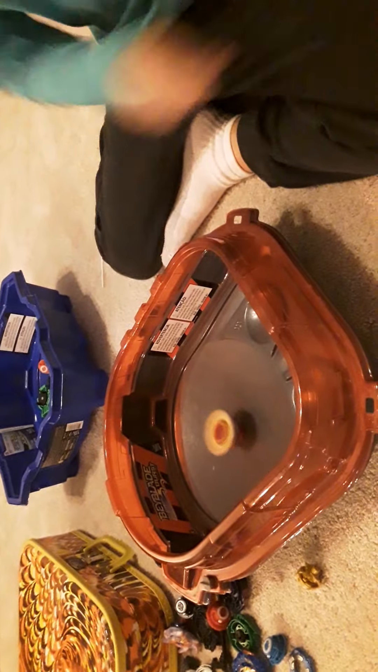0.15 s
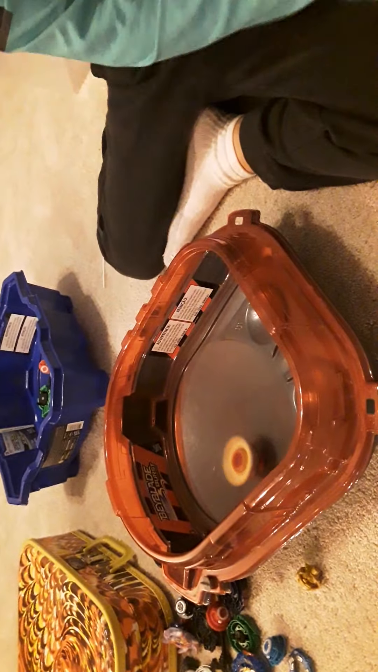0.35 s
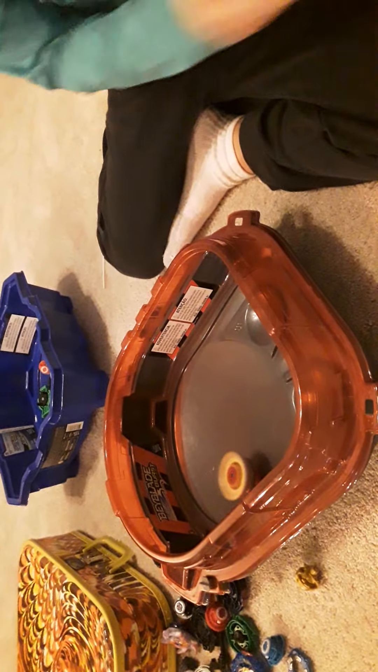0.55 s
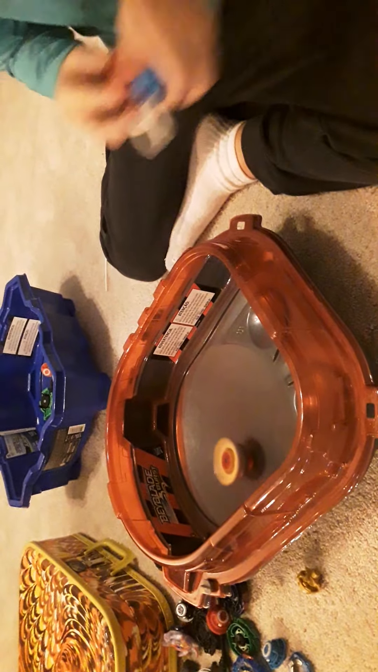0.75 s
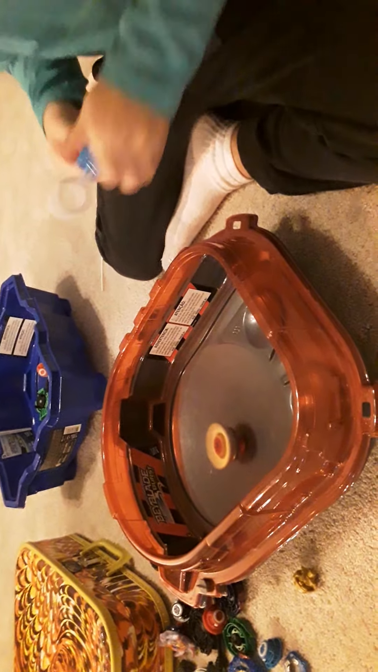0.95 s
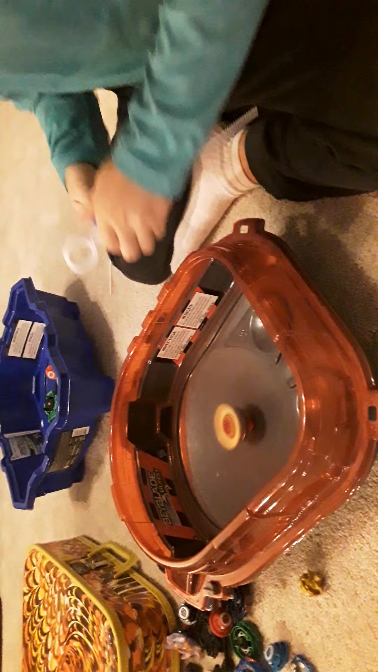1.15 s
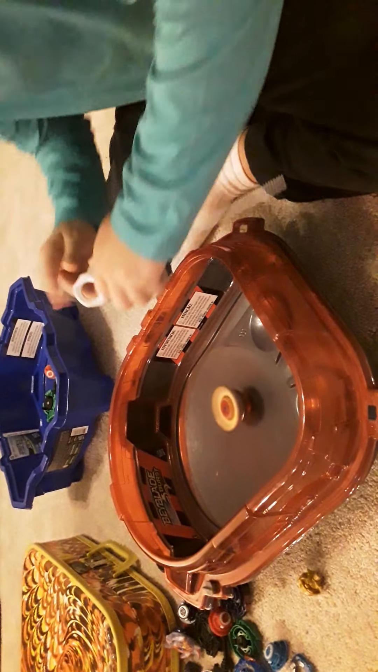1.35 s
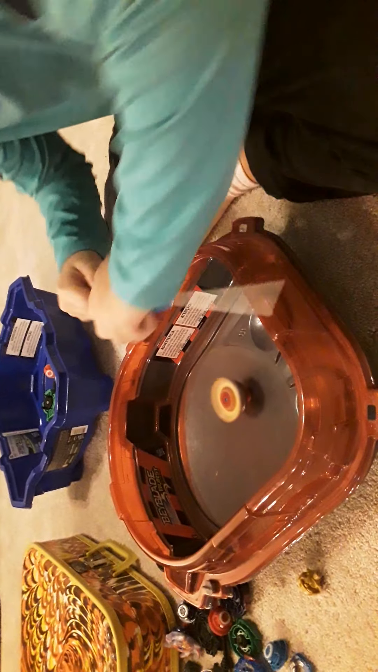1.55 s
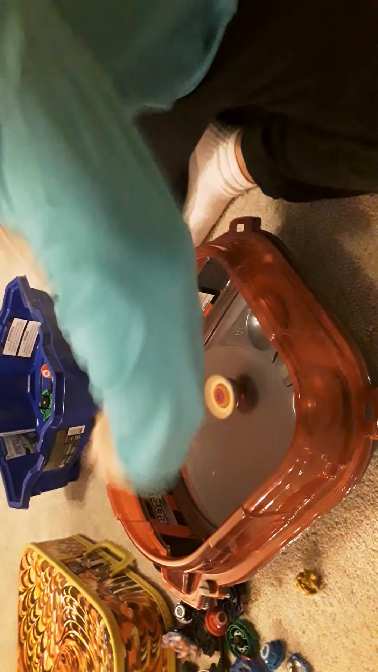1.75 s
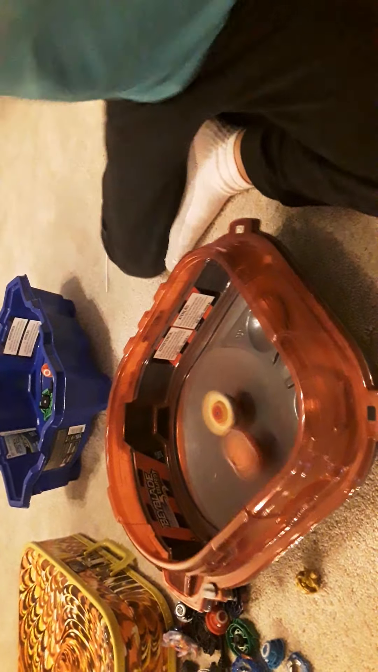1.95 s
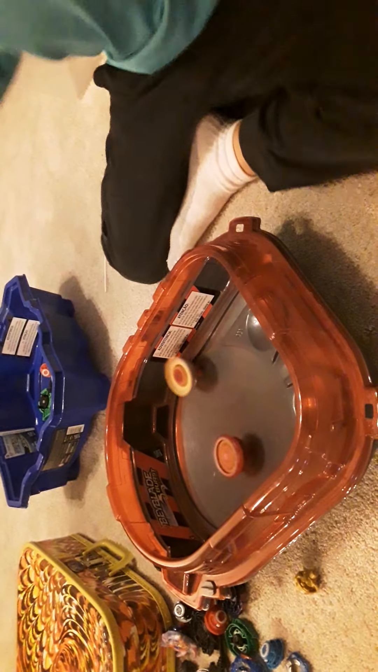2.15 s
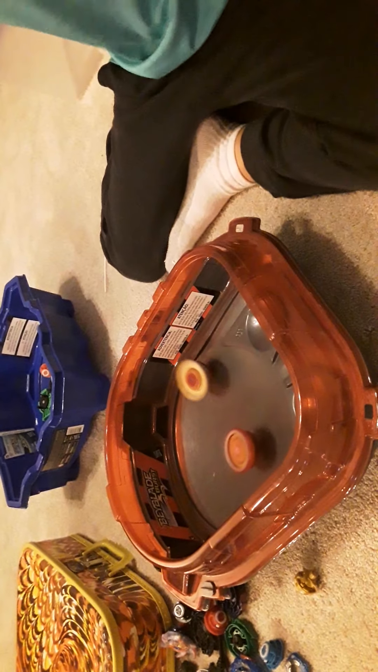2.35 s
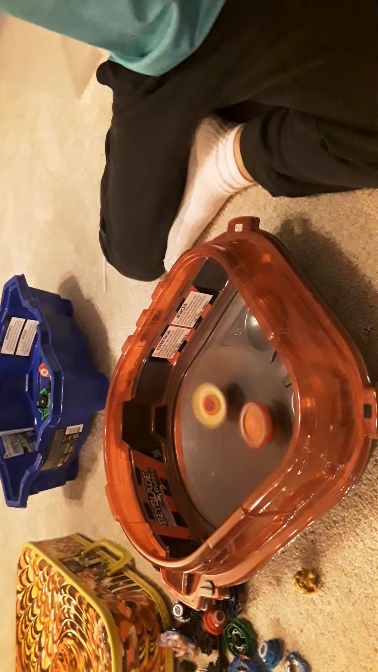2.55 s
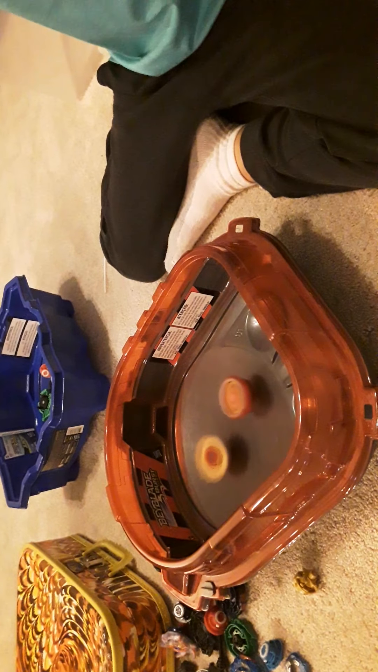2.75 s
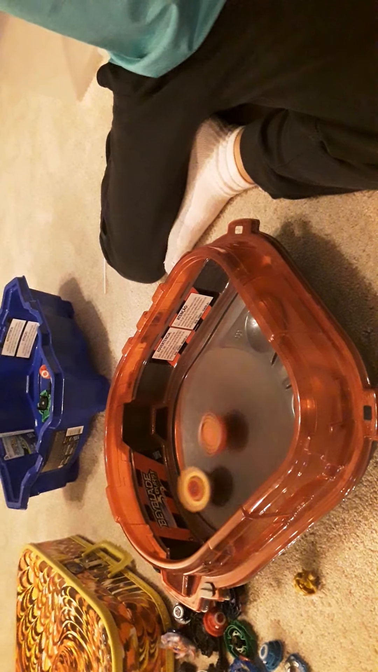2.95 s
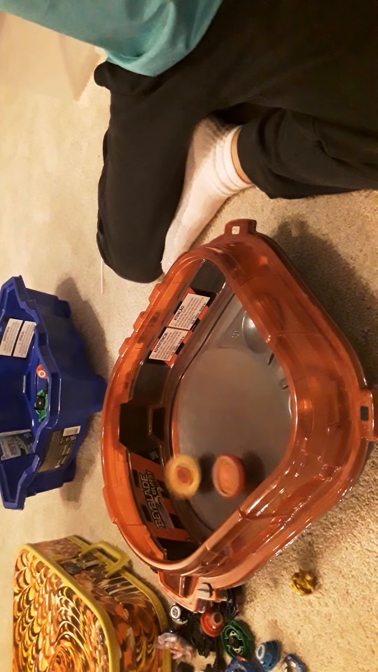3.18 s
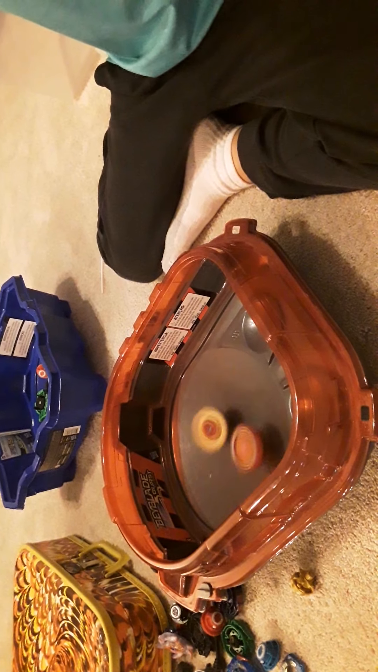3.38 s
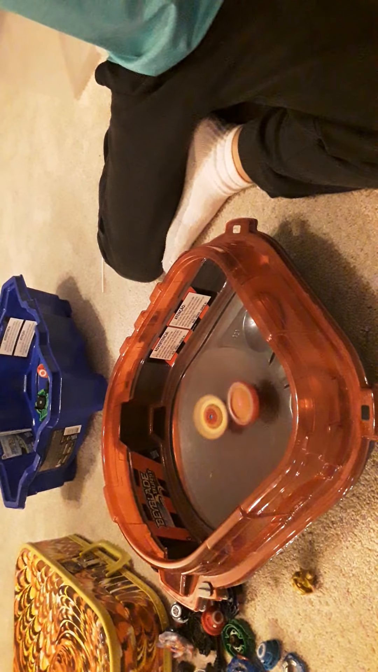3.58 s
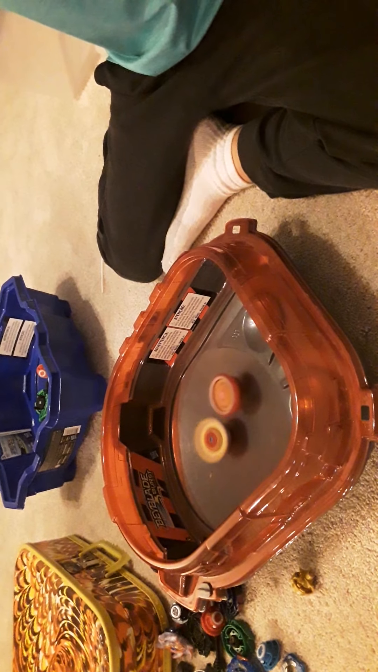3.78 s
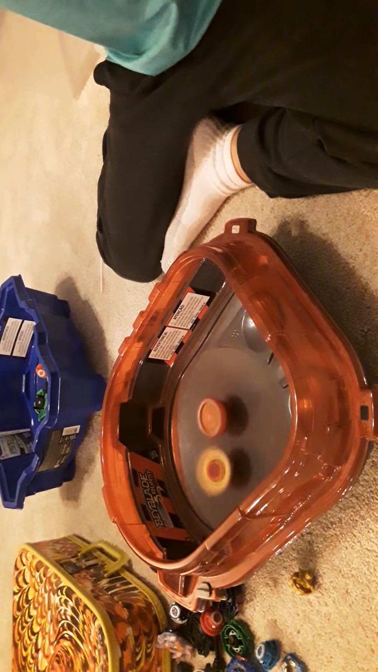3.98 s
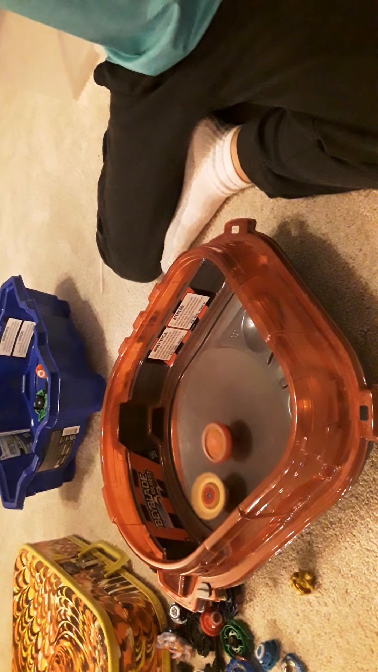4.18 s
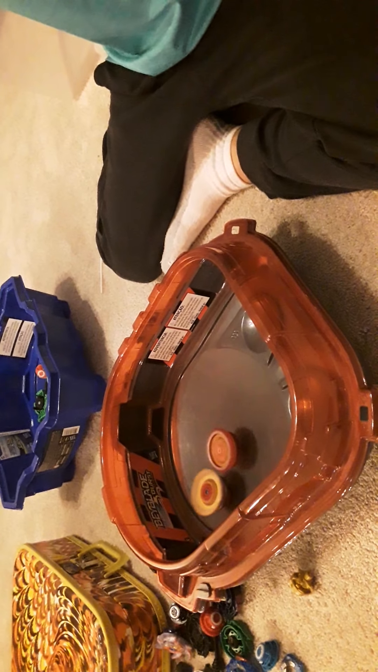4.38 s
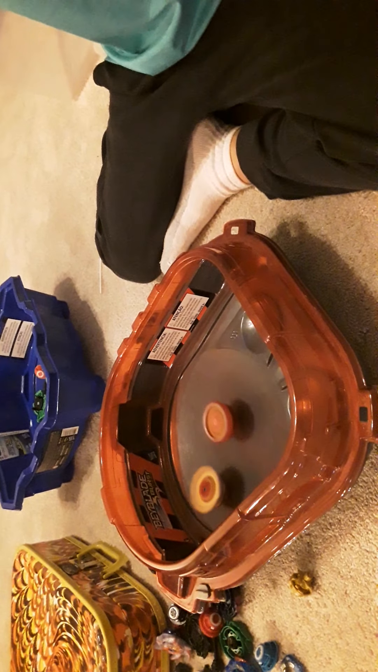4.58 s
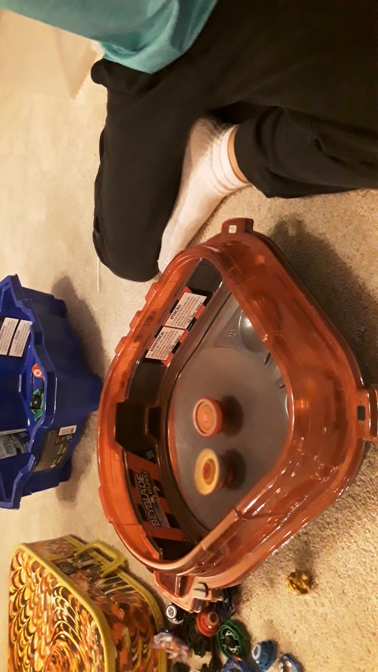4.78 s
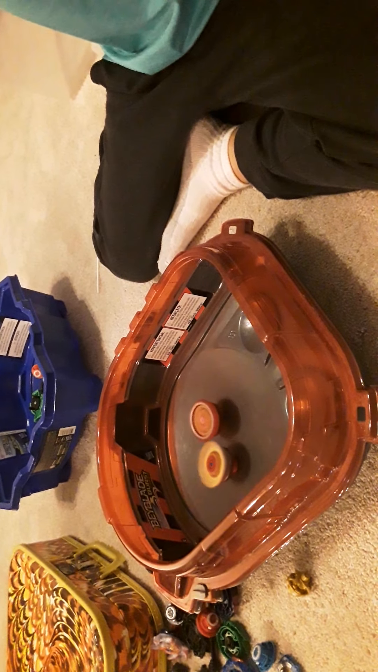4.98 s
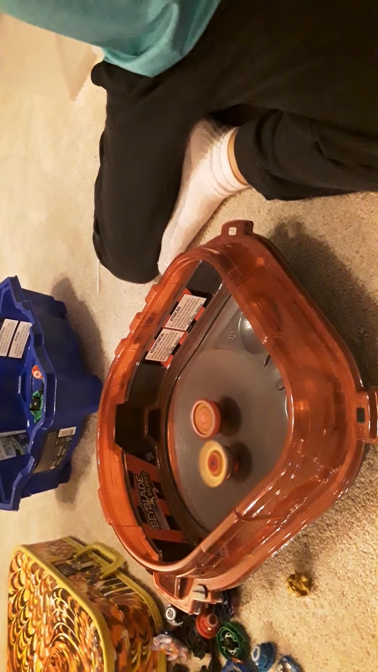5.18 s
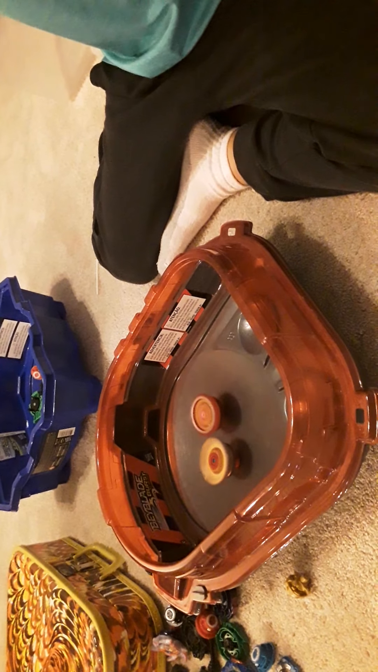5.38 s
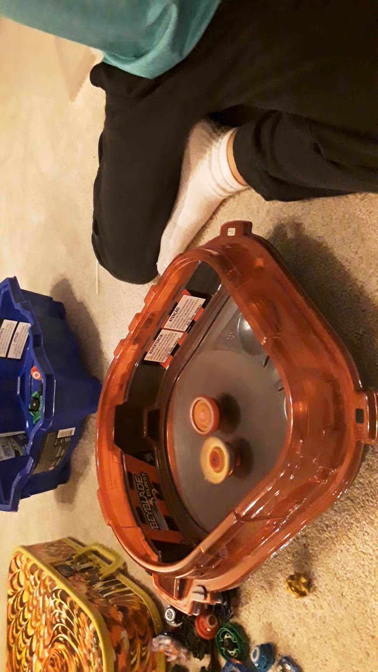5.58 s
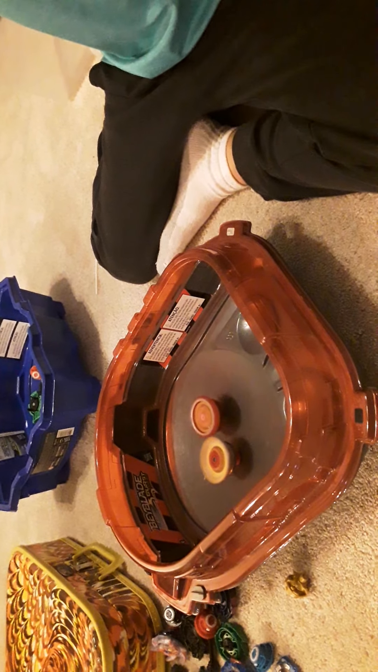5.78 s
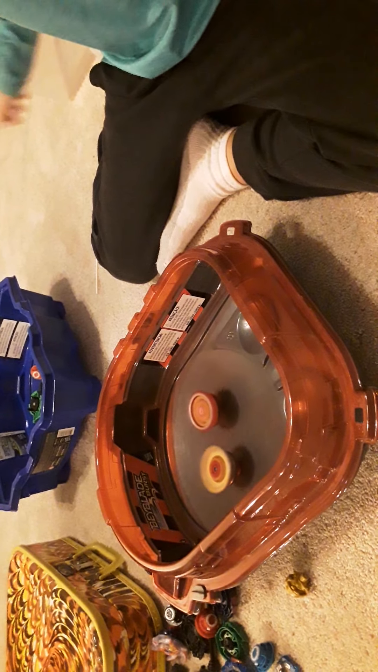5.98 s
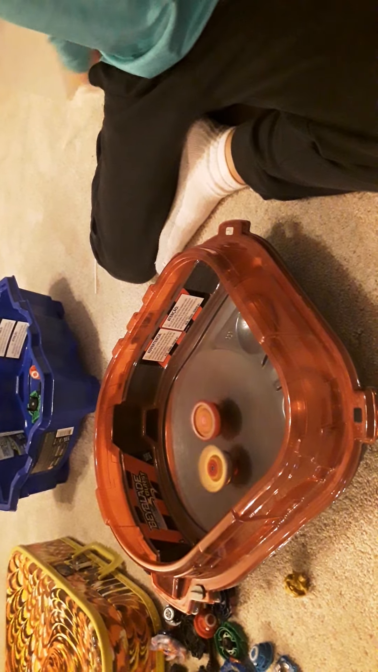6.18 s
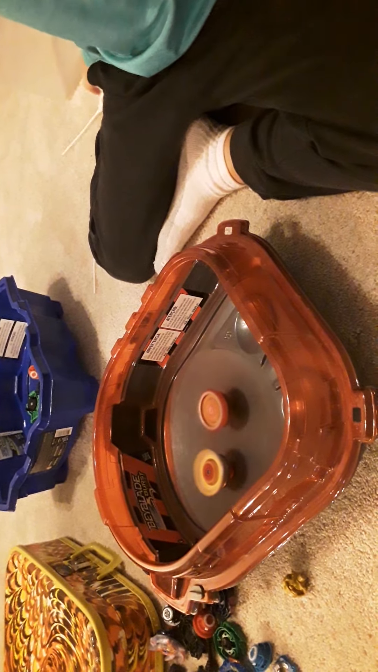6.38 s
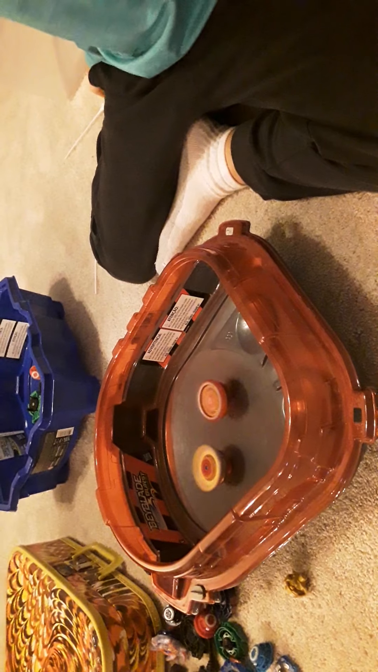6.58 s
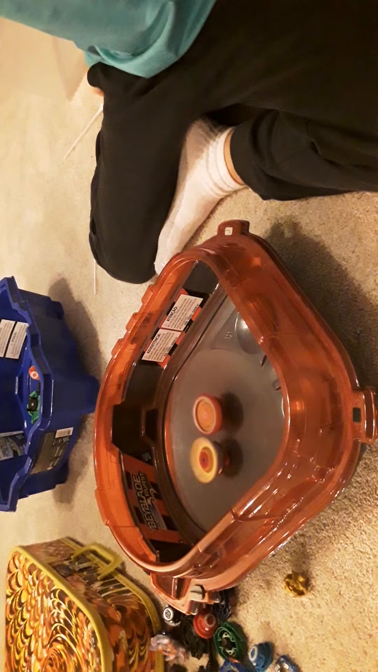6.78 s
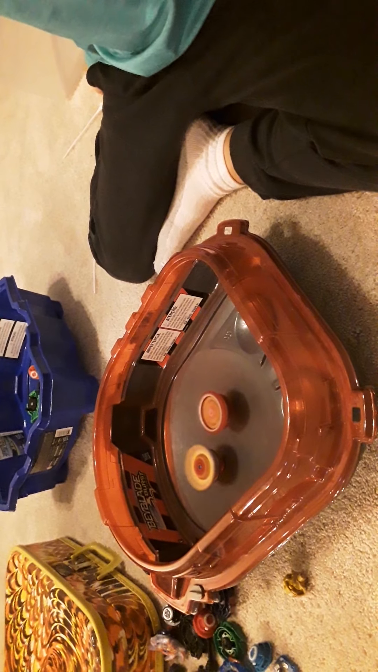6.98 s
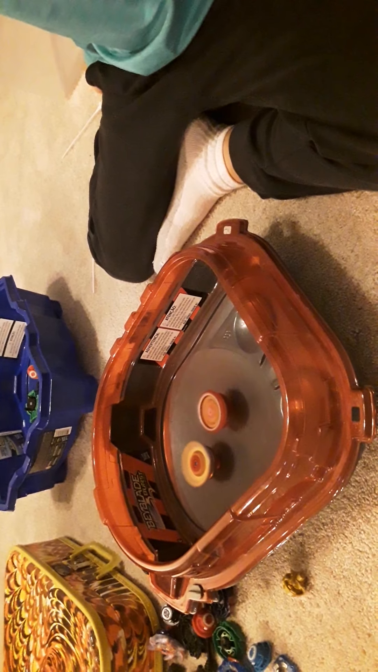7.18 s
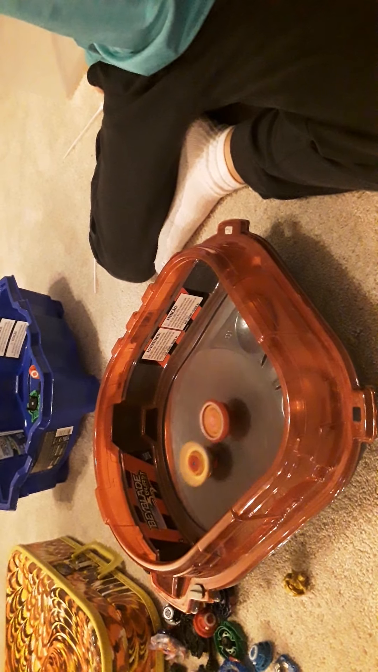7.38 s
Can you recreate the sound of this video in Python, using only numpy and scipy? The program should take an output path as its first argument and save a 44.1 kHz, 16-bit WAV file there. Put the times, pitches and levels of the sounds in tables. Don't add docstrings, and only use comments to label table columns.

```python
import sys
import numpy as np
from scipy import signal
from scipy.fft import rfft, irfft
from scipy.io import wavfile
from scipy.ndimage import uniform_filter1d

SR = 44100
rng = np.random.default_rng(int(sys.argv[2]) if len(sys.argv) > 2 else 0)


def transcribe(u):
    v = np.clip(np.atleast_2d(u).T, -1, 1)
    q = np.round(v * 32767).astype(np.int16)
    wavfile.write(sys.argv[1], SR, q)


def attenuation_scalar(level_db):
    decades = np.asarray(level_db, float) / 20
    return 10 ** decades


N = 327646

# (time [s], peak level [dB], bowl thump [dB], contact length [ms])
BLOWS = [(2.0216, -2.5, -35.5, 9), (3.0734, -8, -18, 2.8), (3.0822, 3, -38, 9), (3.5583, -8.5, -40, 13),
         (3.9863, -5, -49, 2.8), (4.43, -10, -33.5, 7.3), (4.4602, -6.5, -35, 3.6), (4.474, -5.5, -44, 9.7),
         (4.9117, -5.5, -32, 6), (5.0379, -6.5, -25, 5.3), (5.0551, -11, -72, 5.2), (5.0915, -16, -41, 4.1),
         (5.1767, -11.5, -51, 5.8), (5.238, -8, -33.5, 3.1), (5.3649, -11.5, -32, 3),
         (5.6089, -12.5, -29, 7.3), (5.839, -18, -24, 6), (5.8534, -3, -34, 2.8), (6.297, -23, -37, 4),
         (6.3045, -9.5, -28, 4.4), (6.856, -11, -13.5, 3.8), (7.4084, -27.5, -45, 2.7)]
# (time [s],
# peak level [dB], bowl thump [dB], body [dB], contact length [ms])
SLAMS = [(0.0542, -24, -17, -16, 3.5), (0.2452, -9.5, -41, -15.5, 3.2), (1.7962, 7, -11.5, -50, 4.1),
         (1.8331, -11, -31, -12, 6), (1.925, -3.5, -33, -5, 13), (2.027, -14, -1.5, -12, 3),
         (3.1471, -11, -22.5, -9.5, 5.1), (3.2004, -13.5, -24, -10, 1.2), (4.0032, -14, -29, -19, 2.9),
         (4.9249, -13.5, -18.5, -13.5, 14.2), (7.414, -16.5, -27.5, -19.5, 6.7)]
# (frequency [Hz], level [dB], time to fall 60 dB [s])
RESONANCES = [(516, 2, .06), (800, 2, .06), (1035, 1, .06), (1250, -1, .06), (2350, -6, .03),
              (2800, -1, .015), (3300, -8, .03), (4920, -6, .02), (5500, -6, .02), (6500, -6, .02),
              (7150, -4, .015), (7700, -2, .015), (8200, -4, .015), (9350, -4, .02), (10400, -6, .02),
              (11880, -4, .04)]
# (frequency [Hz], density [dB per Hz])
PLASTIC = [(180, -54), (300, -7.5), (526, -24), (1020, -12), (1840, -13), (2790, -9), (3570, -13),
           (4070, -13), (4490, -12.5), (6790, -5), (8010, 2), (9140, -4.5), (11700, -2.5), (15500, -23.5)]
# (frequency [Hz], density [dB per Hz])
LAUNCHER = [(240, -53), (400, -35.5), (605, -30), (821, -26), (928, -37.5), (2030, -20.5), (2880, -9.5),
            (4100, -18), (5230, -12), (7550, -6), (10100, -14.5), (11600, -2), (15500, -21.5)]


def colour(table, hz):
    f, db = np.transpose(table)
    return attenuation_scalar(np.interp(np.log(hz + 1), np.log(f), db))


def causal(gain):
    cepstrum = irfft(np.log(gain + 1e-6))
    half = len(cepstrum) // 2
    cepstrum[1:half] *= 2
    cepstrum[half + 1:] = 0
    return np.exp(rfft(cepstrum))


def resonate(hz, db):
    f, base_db, t60 = np.array(RESONANCES).T[:, :, None]
    width = np.log(1000) / (np.pi * t60)
    return 1 + np.sum(attenuation_scalar(base_db + db[:, None]) / (1 + 2j * (hz - f) / width), axis=0)


def unit(x):
    return x / np.sqrt(np.mean(x ** 2))


def walk(rate):
    hold = int(SR / rate)
    levels = np.repeat(rng.standard_normal(N // hold + 1), hold)
    return unit(uniform_filter1d(levels, hold)[:N])


def part(x, table, lo_hz, hi_hz):
    hz = np.fft.rfftfreq(len(x), 1 / SR) + 1
    edges = 1 / np.sqrt((1 + (lo_hz / hz) ** 6) * (1 + (hz / hi_hz) ** 6))
    return unit(irfft(rfft(x) * edges * colour(table, hz), len(x)))


def contacts(rows, body, scatter_db, rub=False, alike=0., stutter_db=0.):
    # (frequency [Hz], level [dB], time to fall 60 dB [s])
    thump_modes = [(105, 9.5, 0.011), (220, 2.5, 0.013), (540, -16, 0.029)]
    size = 4096
    out = np.zeros((2, N + size))
    t = np.arange(size) / SR
    hz = np.fft.rfftfreq(size, 1 / SR)
    noise = rng.standard_normal((len(rows), size))
    strike = rng.standard_normal((len(rows), len(RESONANCES)))
    noise = alike * noise[0] + np.sqrt(1 - alike ** 2) * noise
    step = int(3 * SR / 1000)
    grip = rng.standard_normal((len(rows), size // step + 1))
    stutter = attenuation_scalar(stutter_db * np.repeat(grip, step, axis=1)[:, :size])
    noise = noise * uniform_filter1d(stutter, step // 2)
    thump = sum(attenuation_scalar(db) * np.sin(2 * np.pi * f * t) * 1000 ** (-t / t60) for f, db, t60 in thump_modes) / 2
    for (s, db, thump_db, body_db, sheen_db, ms), chatter, luck in zip(rows, noise, strike):
        length = max(ms, .5) / 1000
        if rub:
            swell = np.sin(np.pi * np.minimum(t / length, 1))
        else:
            swell = np.minimum(t / 0.00017, 1) * np.exp(-(0.99 * t / length) ** 1.1)
        push = rfft(chatter * swell)
        tilt = colour([(3000, body_db + 14.5), (4800, 0.013), (9500, 0.013), (11500, sheen_db - 0.5)], hz)
        shape = causal(colour(body, hz) * tilt) * resonate(hz, scatter_db * luck)
        crack = irfft(push * shape)
        spread = irfft(push * shape if rub and ms > 9 else shape)
        both = np.array([crack, unit(spread) * np.std(crack)]) / np.abs(crack).max()
        i = int((s - rub * length / 2) * SR)
        boom = attenuation_scalar(thump_db + 6.0) * thump * [[1], [.4]]
        out[:, i:i + size] += attenuation_scalar(db) * (attenuation_scalar(2.5) * both + boom)
    return out[:, :N]


def ticks(rows, body):
    ms = 4.6
    rows = [(s + ms / 2000, db - 5.0, -45, -17, -6, ms) for s, db in rows]
    return contacts(rows, body, 1.5, rub=True, alike=.65)


def hiss():
    # (frequency [Hz], density [dB per Hz])
    house = [(15, -47.5), (25, -19.5), (60, -2.5), (81, 7.5), (125, 12.5), (501, -23.5), (4150, -47.5),
             (7890, -33.5), (15000, -48)]
    return attenuation_scalar(-66.5) * part(rng.standard_normal(N), house, 20, 20000)


def skid(t, db, fade_s):
    hits = SLAMS + BLOWS
    return 1 + sum(attenuation_scalar(db + hit[1]) * (t > hit[0]) * np.exp(-np.abs(t - hit[0]) / fade_s) for hit in hits)


def scraping(t, turn, press, slip, heavy):
    # (frequency [Hz], density [dB per Hz])
    scrape_colour = [(35, -22.5), (60, -23), (91, 2), (132, -1), (210, 2), (394, -4), (433, -3.5),
                     (486, -9.5), (756, -1), (1870, -8), (2840, -14), (4420, -21.5), (5500, -20.5),
                     (7720, -17.5), (9510, -23), (15500, -33.5)]
    grains = rng.standard_normal(N) * attenuation_scalar(3.8 * np.minimum(rng.exponential(size=N), 4))
    grains = grains * attenuation_scalar(1.0 * np.cos(turn) + 1.3 * walk(60))
    spots = -8 + 6 * rng.standard_normal((3, len(RESONANCES)))
    hz = np.fft.rfftfreq(N, 1 / SR)
    grit = 0
    for shift, db in zip((.95, 1, 1.06), spots):
        visit = rfft(grains * attenuation_scalar(1.2 * walk(12)))
        grit = grit + irfft(visit * resonate(hz * shift, db), N)
    thud = rng.standard_normal(N) * attenuation_scalar(2.5 * walk(25))
    scrape = press * skid(t, 28, 0.02) * slip * part(grit, scrape_colour, 4200, 20000)
    drum = press * skid(t, 5.5, 0.089) * part(grit, scrape_colour, 410, 6300)
    rumble = press * skid(t, 6.5, 0.12) * heavy * attenuation_scalar(1.5) * part(thud, scrape_colour, 50, 470)
    return scrape + drum + rumble


def humming(t, turn, hum_db, press):
    # (multiple of the hum [1], level [dB])
    overtones = [(.5, -13.5), (1.5, -6), (2, -4), (2.5, -15.5), (3, -9), (4, -12.5)]
    # (multiple of the hum [1], middle time [s], length [s], level [dB])
    swells = [(.5, .5, 0.74, -51), (3, 0.21, 0.1, -54), (1.5, 0.39, 0.21, -45.5), (2, .62, 0.5, -48.5),
              (3, 0.49, .2, -50), (4, 0.46, 0.19, -46), (3, 0.88, 0.6, -57), (3.5, .42, 0.23, -48),
              (4, 1.12, .35, -57), (2, 1.2, 0.38, -63), (2.5, 2.66, .25, -64), (2.5, 2.8, .25, -55.5),
              (2, 4, .3, -55), (2.5, 3.2, 0.23, -41.5), (2, 2.75, 0.4, -46.5), (5.5, 1.64, .2, -55.5),
              (3, 3.33, 0.16, -41)]
    over = sum(attenuation_scalar(db + 4.1 * walk(3.8)) * np.sin(k * turn + 0.39 * walk(25.0)) for k, db in overtones)
    hum = attenuation_scalar(hum_db + 2.5 * walk(14)) * np.sin(turn + .6 * walk(14))
    hum = hum + attenuation_scalar(-58 + .5 * (20 * np.log10(press) + 51.5)) * over
    for k, s, length, db in swells:
        swell = attenuation_scalar(db) * np.cos(np.pi * np.clip((t - s) / length, -.5, .5))
        hum = hum + swell * np.sin(round(2 * k) / 2 * turn + .4 * walk(18))
    return hum


def rolling():
    # (time [s], pressure [dB], slip [dB], rumble [dB])
    travel = [(0, -49, -16, -6.5), (.2, -49.5, -19, -3), (0.302, -40, 3.5, -13), (.6, -48, 15, -7),
              (.88, -55, 1, -4), (1.21, -55.5, -10.5, 4.5), (1.35, -65.5, -5, 0.5), (1.7, -55, -1, -1.5),
              (2.101, -42, 4, -5.5), (2.471, -58.5, -9.5, 1), (2.68, -42, -15.5, -3.5),
              (2.95, -32, -1.5, 2), (3.27, -58.5, -7, 6), (3.339, -41, -3, -3), (3.43, -53, -6, -3),
              (4.7, -54, -9, -4), (5.45, -70, 4.5, 3.5), (7.43, -80, -3, 2)]
    # (time [s], frequency [Hz], level [dB])
    spin = [(0, 101.8, -50), (.35, 107.6, -40), (0.551, 105, -45.5), (.9, 101.3, -44), (1.35, 100, -53),
            (1.651, 94.64, -44.5), (1.8, 95.76, -66), (2.301, 95.3, -51), (2.75, 90.24, -35.5),
            (3.0, 89.3, -34.5), (3.2, 88.16, -57), (3.6, 82.56, -51.5), (3.999, 80.24, -52),
            (4.8, 72.36, -52), (5.5, 68.4, -67), (6.201, 62.6, -64), (6.701, 61.6, -65), (7.43, 57.7, -99)]
    t = np.arange(N) / SR
    s, press_db, slip_db, rumble_db = np.transpose(travel)
    press = attenuation_scalar(np.interp(t, s, press_db))
    slip = attenuation_scalar(np.interp(t, s, slip_db))
    heavy = attenuation_scalar(np.interp(t, s, rumble_db))
    s, hz, hum_db = np.transpose(spin)
    turn = 2 * np.pi * np.cumsum(np.interp(t, s, hz)) / SR
    return scraping(t, turn, press, slip, heavy) + humming(t, turn, np.interp(t, s, hum_db), press)


def fumbles():
    # (time [s], peak level [dB], body [dB], contact length [ms])
    handling = [(0.014, -37, -17, 4.9), (0.032, -42.5, -4, 5.1), (0.146, -36, -3, 3.1),
                (0.1895, -30.5, -5, 1.1), (.524, -31, 10, 3), (0.556, -28, -5, 2.6), (.666, -30, -8, 3.5),
                (.857, -34, -25, 4), (0.823, -29, -12, 4.1), (0.863, -26.5, -8, 1.2),
                (0.9104, -27.5, -7, 2.4), (1.1067, -17, -31, 0.93), (1.2063, -30, -6.5, 3),
                (1.228, -30.5, -9, 2.2), (1.257, -30.5, -17, 3.3), (1.295, -32, -12.5, 3),
                (1.707, -27.5, -35, 13)]
    return contacts([(s, db, -30.5, body_db, -7, ms) for s, db, body_db, ms in handling], PLASTIC, 1.1)


def slams():
    return contacts([(*row[:4], -5, row[4]) for row in SLAMS], PLASTIC, 2.1)


def loose_ticks():
    # (time [s], peak level [dB])
    knock_times = [(0.1665, -37), (0.2055, -33), (0.2135, -32), (0.2235, -30.5), (0.2405, -21),
                   (0.2604, -20), (0.2803, -11.5), (0.2988, -13.5), (0.317, -14), (0.3358, -10),
                   (0.353, -17.5), (0.3727, -14.5), (0.392, -17.5), (0.4104, -23.5), (0.4294, -23),
                   (0.4494, -17), (0.4561, -17), (0.4738, -15), (0.4933, -14.5), (0.5113, -18),
                   (0.529, -18.5), (0.5487, -19.5), (0.556, -21.5), (0.5665, -24.5), (0.5871, -19),
                   (0.605, -17), (0.6253, -18), (0.6444, -18), (0.663, -24), (0.682, -25), (0.7014, -17.5),
                   (0.7205, -22.5), (0.7403, -18.5), (0.76, -18.5), (0.7801, -27.5), (0.791, -24.5),
                   (0.8001, -29), (1.496, -44), (1.5179, -45), (1.5319, -38), (1.5604, -45), (1.5734, -34),
                   (1.594, -37.5), (1.6154, -31.5), (1.644, -30)]
    # (frequency [Hz], density [dB per Hz])
    tick_colour = [(600, -40), (2700, -24), (4200, -32), (5700, -17), (7700, -10), (8700, -9), (9600, 0),
                   (10600, -7), (13000, -12), (15500, -22)]
    return ticks(knock_times, tick_colour)


def handle():
    # (time [s], peak level [dB], length [ms])
    handle_knocks = [(0.922, -38.5, 9.3), (0.942, -33, 6.6), (0.976, -29, 9.7), (1, -34, 8.9),
                     (1.021, -29.5, 9.7), (1.044, -33.5, 10), (1.064, -47, 9.4), (1.182, -39, 8),
                     (1.206, -36, 8.8), (1.226, -43, 10.3), (1.245, -41, 4.8)]
    # (frequency [Hz], density [dB per Hz])
    hollow = [(300, -23.5), (650, -5), (900, -3.5), (1400, -8), (2000, -6.5), (6000, -45)]
    rows = [(s + ms / 2000, db, -60, -15, -4, ms) for s, db, ms in handle_knocks]
    return contacts(rows, hollow, 1.8, rub=True)


def cord():
    # (middle time [s], peak level [dB], body [dB], length [ms])
    pulls = [
        (.945, -28, -15.5, 5.1),
        (1.06, -21.5, -20, 5.8),
        (1.746, -19, -21, 37),
        (1.760, -9.5, -17.5, 3.3),
        (1.777, -10.5, -20.5, 26.5),
        (1.809, -2, -21.5, 38),
        (1.853, -10, -27.5, 44),
    ]
    rows = [(s, db, -60, body_db, -11, ms) for s, db, body_db, ms in pulls]
    return contacts(rows, LAUNCHER, 0.38, rub=True)


def latch():
    # (time [s], peak level [dB], body [dB], contact length [ms])
    snaps = [
        (0.9678, -5.5, -29, 2),
        (0.998, -4.5, -22.5, 2.6),
        (1.0308, -4.5, -18, 3.8),
        (1.081, -3, -18.5, 2.4),
        (1.6841, -22, -10, 5.4),
    ]
    return contacts([(s, db, -34.5, body_db, -11.5, ms) for s, db, body_db, ms in snaps], LAUNCHER, 1.5)


def gears():
    # (time [s], tooth rate [Hz], level [dB])
    run_up = [
        (1.701, 196.7, -66.5),
        (1.746, 561, -52),
        (1.773, 977, -44.5),
        (1.791, 1260, -41.5),
        (1.8, 1280, -51),
    ]
    t = np.arange(N) / SR
    s, hz, db = np.transpose(run_up)
    phase = 2 * np.pi * np.cumsum(np.interp(t, s, hz)) / SR + .4 * walk(400)
    teeth = np.sin(phase) + 0.36 * np.sin(2 * phase) + 0.81 * np.sin(3 * phase)
    return attenuation_scalar(np.interp(t, s, db, left=-200, right=-200)) * teeth


def landing():
    # (frequency [Hz], level [dB])
    drum_modes = [(194, -8.5), (517, -6.5), (813, 1), (1090, -1.5), (1300, -5.5), (2700, -8)]
    start_s, level_db, t60_s = 1.928, -8, 0.16
    t = np.arange(N) / SR
    fade = attenuation_scalar(level_db) * (t > start_s) * 1000 ** (-np.abs(t - start_s) / t60_s)
    drum = sum(attenuation_scalar(db + 4.5 * walk(70)) * np.sin(2 * np.pi * f * t + 2.1 * walk(60)) for f, db in drum_modes)
    return fade * unit(drum)


def braked_ticks():
    # (time [s], peak level [dB])
    braked_times = [(2.0155, -24.5), (2.162, -29.5), (2.1879, -33.5), (2.2083, -31), (2.2353, -22),
                    (2.2574, -39), (2.2817, -42.5), (2.326, -50.5), (2.373, -33), (2.3965, -27),
                    (2.4211, -41), (2.4436, -32), (2.4659, -35), (2.4838, -35), (2.5126, -33),
                    (2.5359, -36), (2.5604, -29.5), (2.582, -27.5), (2.616, -29), (2.6289, -27.5)]
    # (frequency [Hz], density [dB per Hz])
    braked_colour = [(2700, -19.5), (4400, -22.5), (5600, -24), (7850, -1), (9600, -7.5), (11500, -7),
                     (13500, -18.5), (15500, -33)]
    return ticks(braked_times, braked_colour)


def blows():
    return contacts([(s, db, thump_db, -19, 1, ms) for s, db, thump_db, ms in BLOWS], PLASTIC, 2.1)


def sings():
    # (time [s], peak level [dB], frequency [Hz])
    tones = [
        (2.023, -12, 10640),
        (3.082, -6, 12070),
        (5.854, -21.5, 2900),
        (4.912, -16, 12000),
        (4.929, -14.5, 10350),
        (5.851, -14.5, 11820),
    ]
    t = np.arange(N) / SR
    t60_s = 0.04
    out = 0
    for s, db, hz in tones:
        fade = (t > s) * 1000 ** (-np.abs(t - s) / t60_s)
        out = out + attenuation_scalar(db - 1) * fade * np.sin(2 * np.pi * hz * t)
    return out


def metal():
    # (frequency [Hz], level [dB], time to fall 60 dB [s])
    metal_modes = [(1000, -11.5, 0.3), (2420, -15, 0.15), (2900, -7, 0.15), (4020, -19.5, 0.28),
                   (5130, -10, .2), (6460, -4, 0.35), (6940, 1, .2), (7360, 1.5, 0.17), (8600, -8.5, 0.15),
                   (8400, -4.5, 0.24), (8800, -13, 0.14), (11500, -9, 0.15), (11600, -3.5, 0.11)]
    out = np.zeros(N + SR // 2)
    t = np.arange(SR // 2) / SR
    f, base_db, t60 = np.array(metal_modes).T[:, :, None]
    luck = rng.standard_normal((len(BLOWS), 3, len(metal_modes), 1))
    for (s, db, *_), (a, b, c) in zip(BLOWS, luck):
        waver = 2.2 * np.sin(2 * np.pi * (31 + 6 * b) * t + 2 * c)
        waver = waver + .9 * np.sin(2 * np.pi * (75 + 15 * a) * t + 2 * b)
        tone = np.sin(2 * np.pi * f * (1 + 0.0025 * b) * t + waver + 2 * a)
        ring = attenuation_scalar(base_db + 4 * a) * tone * 1000 ** (-t / t60)
        i = int(s * SR)
        out[i:i + len(t)] += attenuation_scalar(db - 33) * ring.sum(axis=0)
    return out[:N]


def knocks():
    # (time [s], peak level [dB], body [dB])
    small_hits = [(3.457, -29, -27), (3.4848, -33.5, -9), (3.516, -35, -31), (3.5282, -34.5, -6),
                  (3.6197, -31, -20.5), (3.6463, -26.5, -14), (3.6596, -28, -18), (3.793, -42, -6),
                  (3.839, -30.5, -16), (3.8666, -31.5, -15), (3.889, -28, -18), (4.0303, -19.5, -10),
                  (4.0533, -20.5, -11), (4.075, -25, -13), (4.1593, -28, -21), (4.688, -40, -24),
                  (4.797, -53, -23), (4.8795, -36, -11), (5.025, -31, -15), (7.195, -58.5, -9),
                  (6.2755, -49, -23), (5.03, -29, -17), (2.638, -35, -24), (5.627, -20.5, -14),
                  (5.8694, -15, -13.5), (6.318, -19.5, -12), (6.333, -21, -16), (6.869, -22, -8.5),
                  (6.836, -51, -10), (7.32, -70, -9), (4.408, -42, -4)]
    return contacts([(s, db, -19.5, body_db, -7, 3.9) for s, db, body_db in small_hits], PLASTIC, 1.1)


def scuffs():
    # (middle time [s], peak level [dB])
    scuff_times = [(2.6536, -28.5), (2.662, -22.5), (2.6674, -26), (2.675, -29), (2.6801, -42), (2.689, -29.5),
                   (2.6947, -23), (2.6992, -28), (2.7056, -21.5), (2.7146, -20.5), (2.7247, -32), (2.7306, -32.5),
                   (2.739, -31.5), (2.7437, -23.5), (2.7504, -20.5), (2.7559, -16), (2.7687, -25.5),
                   (2.781, -35.5), (2.7922, -21.5), (2.7958, -23.5), (2.8127, -35), (2.8276, -14.5),
                   (2.8358, -20.5), (2.851, -16.5), (2.8578, -14.5), (2.8666, -12.5), (2.8728, -13.5),
                   (2.885, -18), (2.8946, -19), (2.904, -17), (2.9153, -9.5), (2.9199, -17.5), (2.927, -17),
                   (2.933, -28.5), (2.9467, -36), (2.9536, -21.5), (2.959, -14), (2.967, -14), (2.9766, -27),
                   (2.9861, -33), (2.9941, -21.5), (3.0069, -32.5), (3.0149, -15.5), (3.0284, -26), (3.0385, -12),
                   (3.0545, -26),
                   (3.1627, -19.5), (3.1713, -25), (3.1758, -21), (3.185, -25), (3.1936, -51), (3.202, -18),
            (3.214, -22.5), (3.2278, -16), (3.2471, -42), (3.2606, -40), (3.2668, -41), (3.2738, -31),
            (3.2844, -69), (3.2999, -25), (3.3076, -15.5), (3.3124, -15.5), (3.321, -16), (3.3289, -16.5),
            (3.3363, -16.5), (3.3487, -16), (3.3587, -29.5), (3.3648, -43), (3.3702, -23), (3.3751, -21.5),
            (3.3815, -24), (3.3929, -41)]
    # (frequency [Hz], density [dB per Hz])
    rim_colour = [(290, -43.5), (760, -10), (1900, -18), (2720, -9.5), (4440, -19), (7890, -2),
                  (10000, -5.5), (12300, -10.5), (15500, -31)]
    rows = [(s, db - 1.5, -40, -15, -2.5, 8.5) for s, db in scuff_times]
    return contacts(rows, rim_colour, 4.0, rub=True, stutter_db=1.5)


def rubs():
    # (middle time [s], peak level [dB], body [dB], length [ms])
    wall_rubs = [
        (3.573, -14.5, -10.5, 13.4),
        (3.701, -30.5, -13, 15.7),
        (3.900, -24, -10, 15),
        (4.109, -21.5, -10, 31),
    ]
    rows = [(s, db, -60, body_db, -11, ms) for s, db, body_db, ms in wall_rubs]
    return contacts(rows, PLASTIC, .7, rub=True, stutter_db=3.5)


def whine():
    start_s, end_s, hz, level_db = 4.1, 4.6, 2240, -64
    t = np.arange(N) / SR
    on = np.clip(np.minimum(t - start_s, end_s - t) / 0.14, 0, 1)
    return attenuation_scalar(level_db + 2.9 * walk(30)) * on * np.sin(2 * np.pi * hz * t + 1.0 * walk(45))


def taps():
    # (time [s], peak level [dB])
    tap_times = [(4.2233, -37), (4.2408, -54), (4.2524, -38), (4.2697, -31.5), (4.2936, -32),
                 (4.3094, -42.5), (4.3261, -38), (4.3444, -41), (4.3725, -32), (4.3894, -43), (4.6074, -31),
                 (4.6374, -35), (4.6524, -34), (4.6823, -36), (4.7042, -27), (4.7174, -36), (4.7356, -31),
                 (4.7484, -31.5), (4.7671, -34.5), (4.7814, -30), (4.7985, -30.5), (4.8294, -30),
                 (4.8614, -41)]
    # (frequency [Hz], density [dB per Hz])
    tap_colour = [(600, -22), (1500, -6), (2250, 1), (2750, -1), (3300, 0), (4500, -21), (7700, -1),
                  (10000, -8), (15500, -32)]
    return ticks(tap_times, tap_colour)


def calm_ticks():
    # (time [s], peak level [dB])
    calm_times = [(6.0821, -40), (6.1144, -48), (6.1469, -51), (6.1769, -45), (6.2108, -49), (6.2457, -53),
                  (6.4934, -46), (6.5254, -52.5), (6.5555, -43), (6.5869, -43), (6.6194, -45.5),
                  (6.6498, -41), (6.6822, -41), (6.7156, -49), (6.7471, -51), (6.7794, -66), (6.8144, -68)]
    # (frequency [Hz], density [dB per Hz])
    calm_colour = [(1000, -36), (2200, -17), (3050, -7), (4300, -30), (6300, -20), (7400, 0), (8900, -12),
                   (9900, -5), (15500, -33)]
    return ticks(calm_times, calm_colour)


def room(x):
    # (frequency [Hz], time to fall 60 dB [s])
    decay = [(100, 0.19), (400, 0.35), (1500, 0.39), (4000, 0.45), (8000, 0.3), (12000, 0.13),
             (15500, 0.09)]
    # (delay [s], level [dB])
    echoes = [(.0045, -12), (0.0119, -17), (.016, -15), (.028, -23)]
    t = np.arange(SR // 2) / SR
    f, t60 = np.transpose(decay)
    tail = 0
    for hz in 60 * 2 ** np.arange(0, 8.3, .5):
        band = part(rng.standard_normal(len(t)), [(1, 0), (2, 0)], hz / 2 ** .25, hz * 2 ** .25)
        fade = 1000 ** (-t / np.interp(np.log(hz), np.log(f), t60))
        tail = tail + np.sqrt(hz / 8000) * band * fade
    answer = attenuation_scalar(-45.5) * tail * np.minimum(t / 0.03, 1) ** 2
    for s, db in echoes:
        smear = rng.standard_normal(len(t)) * (t >= s) * np.exp(-np.abs(t - s) / .0045)
        answer += attenuation_scalar(db) * smear / np.sqrt(np.sum(smear ** 2))
    return signal.fftconvolve(x, answer)[:N]


def scene():
    hands = fumbles() + handle() + cord() + latch() + gears()
    clashes = slams() + blows() + sings() + metal()
    touches = knocks() + scuffs() + rubs() + whine()
    turning = loose_ticks() + braked_ticks() + taps() + calm_ticks()
    bowl = attenuation_scalar(-4.5) * (rolling() + landing())
    near, far = hands + clashes + touches + turning + bowl
    return (near + room(far) + hiss())[None]


def band_limit(x):
    return signal.sosfilt(signal.butter(12, 16400, fs=SR, output="sos"), x)


def record(dry):
    thin = signal.sosfilt(signal.butter(2, 75, "high", fs=SR, output="sos"), dry)
    flat = np.clip(thin, -.9, .9)
    mix = signal.sosfiltfilt(signal.butter(14, 15900, fs=SR, output="sos"), flat)
    return band_limit(mix)


dry = scene()
out = record(dry)
transcribe(out)
```